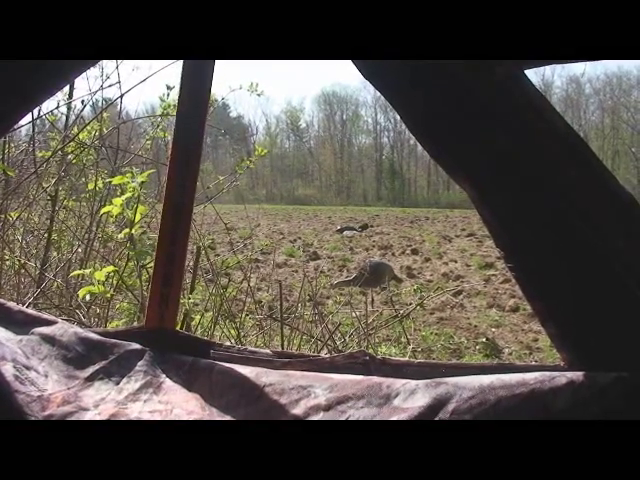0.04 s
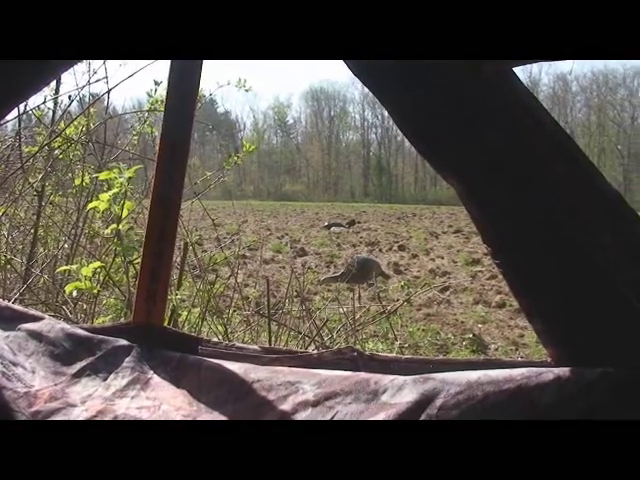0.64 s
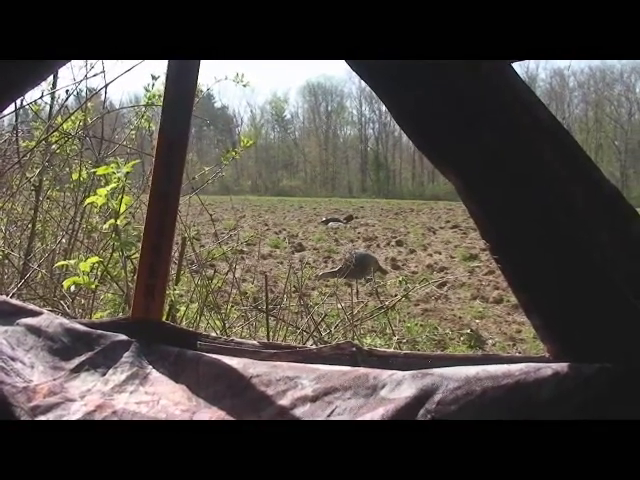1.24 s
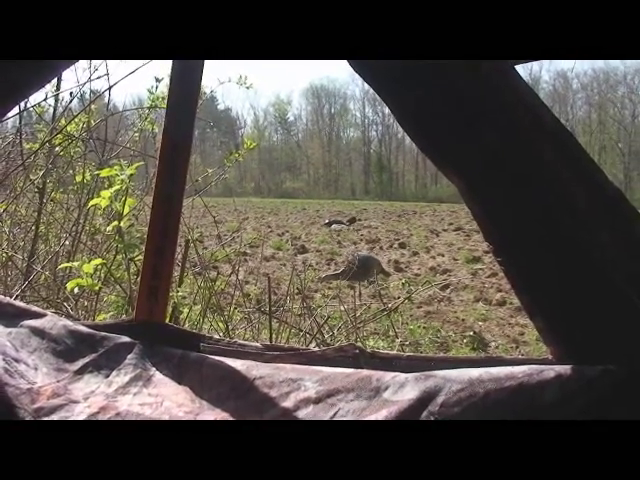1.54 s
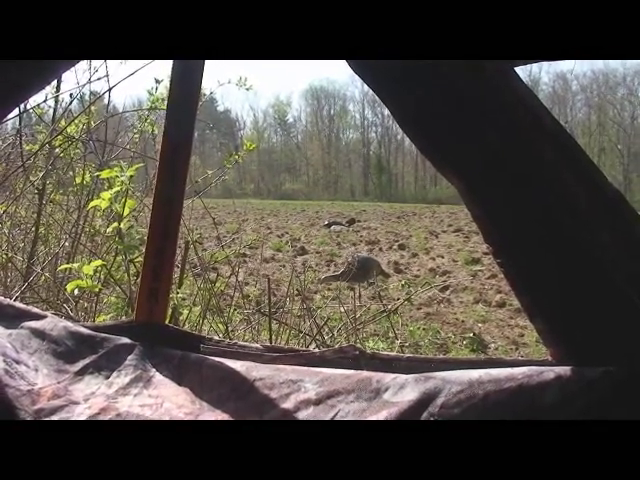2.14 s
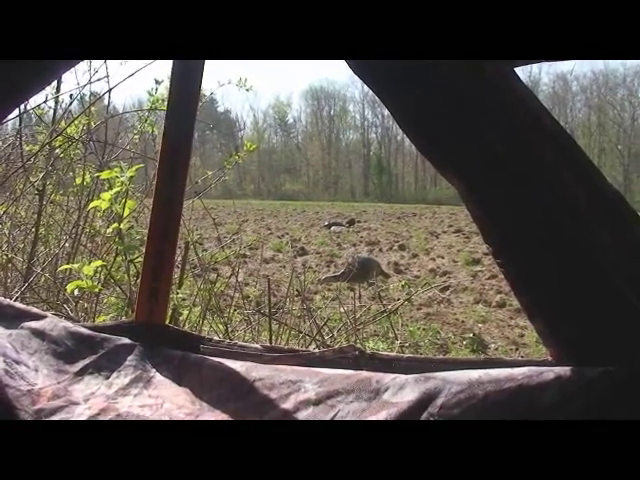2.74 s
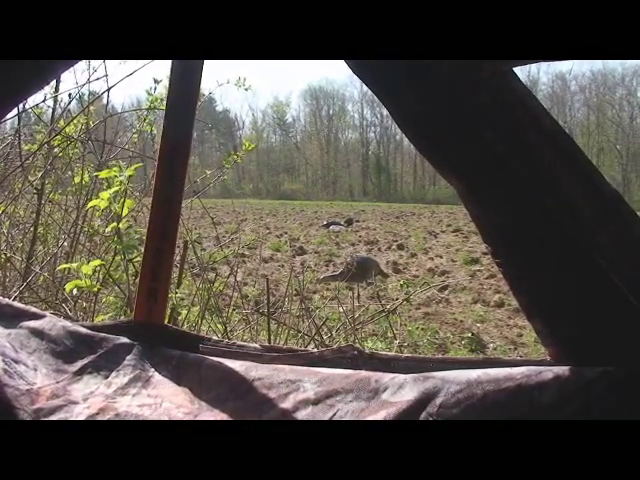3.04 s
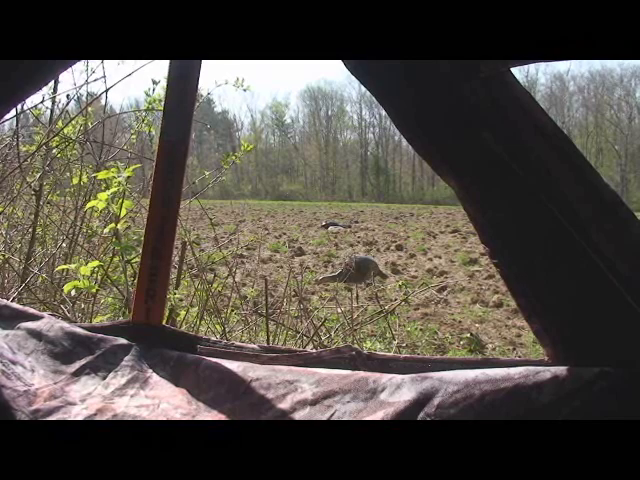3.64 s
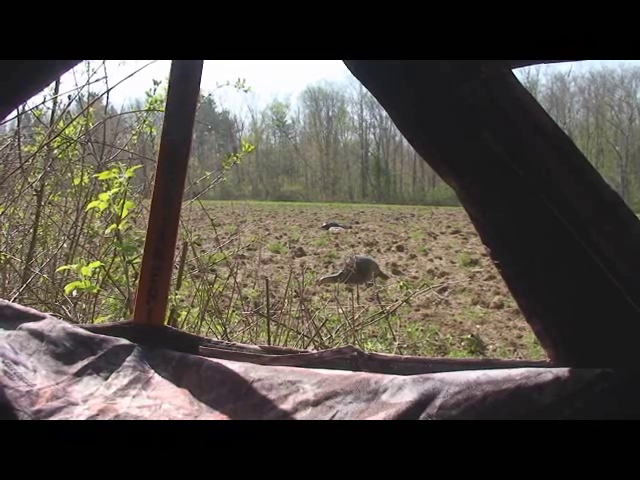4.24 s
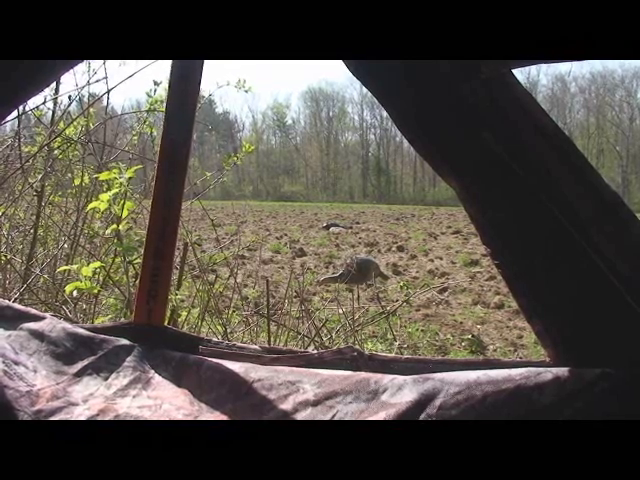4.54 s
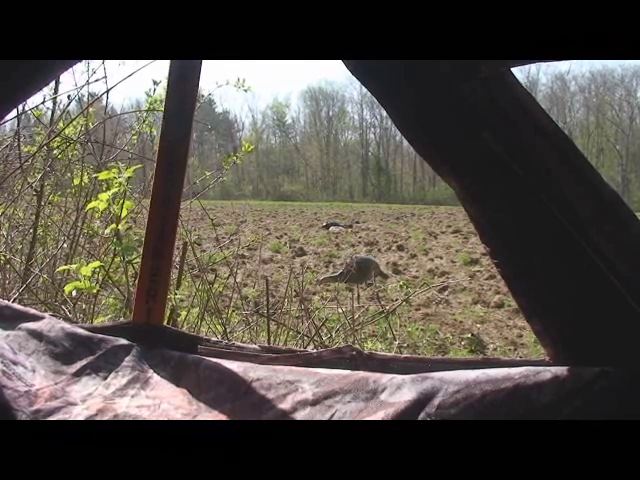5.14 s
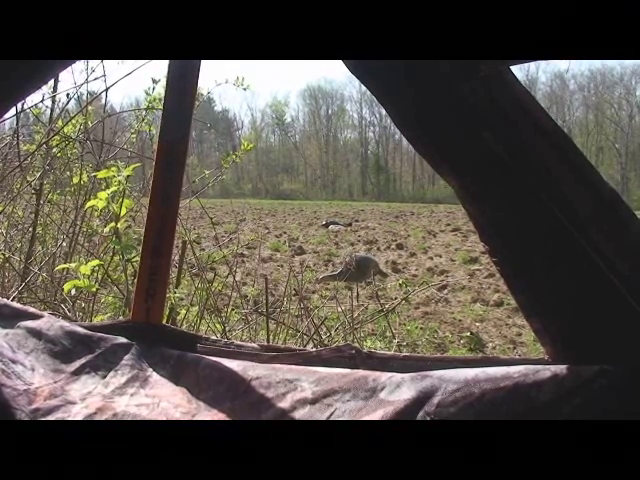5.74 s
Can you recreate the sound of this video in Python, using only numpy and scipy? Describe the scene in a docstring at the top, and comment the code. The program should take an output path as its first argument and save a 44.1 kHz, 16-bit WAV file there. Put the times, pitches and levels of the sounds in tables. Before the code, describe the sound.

A turkey close by gives a fast, loud run of short, scratchy yelps, with a few soft clucks and dry ticks in an open field.

```python
"""A turkey close to a cloth blind at the edge of a field, over a low rumble and open air.
Three dry ticks and a soft cluck come first. From 0.9 to 4.6 s the bird gives seventeen yelps:
a membrane in its throat starts in a scratchy squeak, breaks down to a reedy note, sags and frays out.
Two more ticks and two soft clucks follow. The blind rings briefly after each sound."""
import sys
import numpy as np
from scipy import signal
from scipy.fft import rfft, irfft, next_fast_len
from scipy.io import wavfile
from scipy.ndimage import uniform_filter1d, minimum_filter1d, map_coordinates

SR = 44100
rng = np.random.default_rng(int(sys.argv[2]) if len(sys.argv) > 2 else 0)


def store_pcm(level_fs):
    """Save levels as 16-bit WAV."""
    pcm = np.round(np.clip(level_fs, -1, 1) * 32767).astype(np.int16)
    wavfile.write(sys.argv[1], SR, np.atleast_2d(pcm).T)


N = 255117
TOP_HZ = 15100


def amp(db):
    return 10 ** (np.asarray(db) / 20)


def unit_rms(x):
    return x / np.sqrt(np.mean(x ** 2) + 1e-20)


def blend(a, b, share):
    return a + (b - a) * share


def along(points, hz):
    """Interpolate (Hz, value) points on a log frequency axis."""
    point_hz, values = np.transpose(points)
    return np.interp(np.log(hz + 1), np.log(point_hz + 1), values)


def wobble(rate_hz, size):
    """A smooth random curve with rate_hz knots a second."""
    knots = rng.standard_normal(int(size * rate_hz / SR) + 4)
    return map_coordinates(knots, [np.arange(size) * rate_hz / SR])


def step(x, width):
    """A smooth rise from 0 to 1 around x = 0."""
    return .5 + .5 * np.tanh(x / width)


def filtered(x, response):
    """Apply a complex gain given as a function of Hz."""
    size = x.shape[-1]
    padded = next_fast_len(size + 4096)
    return irfft(rfft(x, padded) * response(np.fft.rfftfreq(padded, 1 / SR)), padded)[..., :size]


def noise(spectrum, size):
    """Coloured noise of rms 1."""
    return unit_rms(filtered(rng.standard_normal(size), lambda hz: amp(along(spectrum, hz))))


def add(track, sound, start_s):
    """Mix a stereo sound into the track."""
    part = track[:, max(round(start_s * SR), 0):][:, :sound.shape[1]]
    part += sound[:, :part.shape[1]]


def wide_noise(spectrum, width):
    """Stereo noise of rms 1; width is side over mid."""
    mid, side = noise(spectrum, N), noise(spectrum, N)
    return unit_rms(mid + width * np.array([[1], [-1]]) * side)


# Background level curves. Each row: time in seconds, relative rumble in dB, relative air in dB.
FIELD_LEVELS = [(0.0, -54, -59.5), (0.71, -53, -57.5), (1.0, -60, -49.5), (2.0, -75, -61), (3.64, -70, -63),
                (3.91, -67, -56.5), (4.23, -68, -69), (4.52, -78, -63), (5.02, -60.5, -64.5),
                (5.78, -61.5, -67)]
# Rumble and air spectra. Each row: frequency in Hz, relative density in dB.
RUMBLE_SPECTRUM = [(20, 2.5), (35, -7.5), (65, 7.5), (95, 8), (135, -1), (250, -11), (500, -10.5),
                   (1200, -85)]
AIR_SPECTRUM = [(100, -15.5), (400, -3.5), (800, -2), (1250, -1.5), (2000, -8.5), (3200, -15),
                (6500, -20.5), (11500, -23.5), (13500, -28.5), (15000, -49.5)]

def field():
    """A low, nearly mono rumble under a wider hush of open air."""
    times_s, *curves = np.transpose(FIELD_LEVELS)
    rumble_db, air_db = [np.interp(np.arange(N) / SR, times_s, curve) for curve in curves]
    rumble = amp(rumble_db + 3.5 + 2.2 * wobble(14, N)) * wide_noise(RUMBLE_SPECTRUM, width=.081)
    air = amp(air_db + 2.5 + .61 * wobble(25, N)) * wide_noise(AIR_SPECTRUM, width=.75)
    return rumble + air


# Decay of the blind. Each row: frequency in Hz, T60 in seconds.
BLIND_T60 = [(300, 0.067), (2000, 0.13), (5000, 0.15), (12000, 0.11)]
# Strength of its reflections. Each row: frequency in Hz, reflected over direct in dB.
BLIND_ECHO = [(600, -12), (1500, -11.5), (2400, -11), (5000, -4), (12000, -4)]
# Balance of the direct sound. Each row: frequency in Hz, left minus right in dB.
LEFT_GAIN = [(700, -0.5), (1300, 1), (2300, 2.5), (4300, 3), (8000, -1)]
# Phase of the direct sound. Each row: frequency in Hz, lead of the left port in radians.
LEFT_LEAD = [(100, -0.36), (780, -1.89), (2300, -1.31), (3200, -1.6), (5000, -0.49), (7000, 0.43),
             (14000, 0.89)]

def blind(x):
    """A near sound reaches two microphone ports directly and in a short wash of reflections."""
    band_hz, t, bands = signal.stft(rng.standard_normal((2, SR // 4)), SR, nperseg=256)
    decay = amp(-60 * t / along(BLIND_T60, band_hz)[:, None])
    tail = signal.istft(bands * decay, SR, nperseg=256)[1]
    tail *= step(np.arange(tail.shape[1]) / SR - .003, .00064)
    wash = signal.fftconvolve(x[None], tail / np.linalg.norm(tail[0]), axes=1)[:, :len(x)]
    side = np.array([[.5], [-.5]])
    ports = lambda hz: amp(side * along(LEFT_GAIN, hz)) * np.exp(1j * side * along(LEFT_LEAD, hz))
    return filtered(x, ports) + filtered(wash, lambda hz: amp(along(BLIND_ECHO, hz)))


# Dry ticks. Each row: start in seconds, relative level in dB, relative treble in dB.
TICKS = [(.163, -40, -37), (.273, -36, -41), (.657, -43, 1), (5.056, -44.5, 9), (5.185, -42, -5)]
# Tick spectrum. Each row: frequency in Hz, relative density in dB.
TICK_SPECTRUM = [(200, -6), (1300, 7), (2500, 0.5), (5000, -13), (10000, -19), (14000, -42)]

def tick(level_db, treble_db, t60_s=.081):
    """A tiny dry snap of fast-decaying noise."""
    size = SR // 8
    t = np.arange(size) / SR
    shelf = lambda hz: amp((treble_db + 8.5) * step(hz - 3500, 1200))
    snap = unit_rms(filtered(noise(TICK_SPECTRUM, size), shelf))
    return amp(level_db - 9.5) * snap * amp(-60 * t / t60_s)


def membrane(pitch_hz, tone_db, flicker_db, partials=21):
    """A vibrating membrane heard through resonances; returns its wave at rms 1 and its phase."""
    order = np.arange(1, partials + 1)[:, None]
    phase = 2 * np.pi * np.cumsum(pitch_hz) / SR
    partial_hz = order * uniform_filter1d(pitch_hz, size=130)
    # high resonances shift as the mouth moves, so upper partials come and go
    flicker = np.array([wobble(22, len(pitch_hz)) for _ in order]) * step(partial_hz - 3000, 500)
    gain = amp(tone_db(partial_hz) + flicker_db * flicker) * (partial_hz < TOP_HZ)
    waves = gain * np.sin(order * phase + rng.uniform(0, 2 * np.pi, (partials, 1)))
    return waves.sum(0) / np.sqrt((gain ** 2).sum(0) / 2), phase


# Soft clucks. Each row: start in seconds, level in dB, pitch in Hz.
CLUCKS = [(0.73, -30.5, 610), (5.227, -37.5, 643.5), (5.661, -39.5, 625)]
# Cluck spectrum. Each row: frequency in Hz, relative level in dB.
CLUCK_SPECTRUM = [(600, -6), (1200, 6), (1850, 0), (2500, -18.5), (3700, -14), (6000, -34.5), (12000, -51)]

def cluck(level_db, pitch_hz):
    """A short, hoarse note: a jittering membrane plus noise of the same colour."""
    size = SR // 4
    t = np.arange(size) / SR
    jittered_hz = pitch_hz * np.exp(.041 * wobble(970, size))
    wave, _ = membrane(jittered_hz, lambda hz: along(CLUCK_SPECTRUM, hz), flicker_db=-8.5)
    swell = step(t - .006, .0054) * (1 - step(t - .019, .02))
    return amp(level_db) * swell * (wave + .58 * noise(CLUCK_SPECTRUM, size))


# Throat resonances. Each row: frequency in Hz, relative partial level in dB.
THROAT_RESPONSE = [(620, -6), (770, -22), (880, -19), (1050, -7), (1480, 5), (1590, -7.5), (1900, -2),
                   (2350, 2.5), (3050, -16), (3800, -18.5), (4300, -26), (5200, -18), (9200, -33.5),
                   (11200, -26), (13000, -57)]
# Throat turbulence and air past the membrane. Each row: frequency in Hz, relative density in dB.
RASP_SPECTRUM = [(150, -37.5), (600, -41), (850, -15.5), (1080, 2.5), (1650, -0.5), (2250, 7), (3300, -15),
                 (4300, -13), (5500, -17.5), (7800, -9), (9300, -28), (11300, -24.5), (12400, -45),
                 (15000, -63.5)]
HISS_SPECTRUM = [(2500, -33), (4250, -14), (5000, 3.5), (6700, -1.5), (8700, -23.5), (10700, -3),
                 (12500, -13), (15000, -55.5)]

def throat(pitch_hz, rough, open_db, treble_db):
    """Air drives the membrane and escapes in one puff per cycle; returns the voice and the hiss."""
    size = len(pitch_hz)
    jitter = .0028 * wobble(120, size) + rough * (.0517 * wobble(349.8, size) + .052 * wobble(1500, size))
    # a wider mouth gives stronger overtones
    tone_db = lambda hz: along(THROAT_RESPONSE, hz) + open_db * step(hz - 1900, 180)
    wave, phase = membrane(pitch_hz * np.exp(jitter), tone_db, flicker_db=3.5)
    wave *= amp(3.7 * rough * wobble(450, size))
    puffs = 1 + .5 * np.cos(phase)
    rasp = filtered(noise(RASP_SPECTRUM, size), lambda hz: amp(1.2 * open_db * step(hz - 1900, 300)))
    rasp_share = .68 * rough
    voice = np.sqrt(1 - rasp_share ** 2) * wave + rasp_share * unit_rms(rasp * puffs)
    # the small mouth radiates little bass
    radiation = lambda hz: amp(treble_db * step(hz - 3800, 1100) - 5.5 * step(400 - hz, 140))
    leak = amp(-23.5 + .5 * treble_db) * np.sqrt(.3 + rough)  # a clean note leaks less air
    return filtered(voice, radiation), leak * unit_rms(noise(HISS_SPECTRUM, size) * puffs)


# Yelps. Each row: start, break to the note, stop and fade width in seconds, squeak and note pitch
# in Hz, level in dB, treble lift in dB, roughness of the note from 0 to 1.
YELPS = [(.902, .915, .978, .003, 1130, 1038, -20, -3, .06),
         (1.111, 1.129, 1.205, .007, 1070, 630, -20, 5, .06),
         (1.313, 1.327, 1.387, .006, 1150, 693, -17.5, -6, .04),
         (1.495, 1.513, 1.579, .004, 1270, 729, -17, 2.5, .06),
         (1.67, 1.695, 1.75, .01, 1260, 757, -19.5, -1.5, .02),
         (1.86, 1.872, 1.945, .01, 1220, 758, -20, -2.5, .03),
         (2.06, 2.081, 2.144, .009, 1080, 769, -20, -3, .1),
         (2.278, 2.307, 2.369, .008, 1160, 776, -19.5, -3, .07),
         (2.511, 2.531, 2.593, .008, 1030, 777, -20, -3.5, .07),
         (2.741, 2.767, 2.832, .018, 1160, 787, -19, -1, .07),
         (3.003, 3.047, 3.1, .016, 1150, 765, -21, -1, .65),
         (3.251, 3.277, 3.346, .012, 1290, 773, -20, -1.5, .05),
         (3.487, 3.523, 3.572, .024, 1260, 784, -20, -1.5, .08),
         (3.776, 3.789, 3.882, .022, 1320, 1272, -20.5, -2.5, .22),
         (4.055, 4.096, 4.157, .009, 1240, 765, -19.5, 0, .03),
         (4.276, 4.303, 4.38, .014, 1060, 751, -20, -1.5, .03),
         (4.511, 4.534, 4.611, .016, 1130, 758, -20, -1, .04)]
WARM_UP_S, ATTACK_S = .33, .0018
SAG_PER_S, FRAY_HZ = .72, 1060

def yelp(start_s, break_s, stop_s, fade_s, squeak_hz, note_hz, level_db, treble_db, note_rough):
    """The membrane squeaks, drops to its low register, then loses its grip."""
    t = start_s + np.arange(int(.4 * SR)) / SR
    # as the bird warms up, its mouth opens and the squeak hardens
    effort = 1 - np.exp((YELPS[0][0] - start_s) / WARM_UP_S)
    overblown = step(note_rough - .15, .03)  # rough yelps open wider and swoop in from above
    open_db = blend(-34, 2, effort) + 2.5 * overblown
    squeak_db = blend(-5, -2.5, effort)
    squeak_rough = blend(blend(.43, .54, effort), .2, overblown)

    broken = step(t - break_s, .00057)
    frayed = t > stop_s + .2 * fade_s  # the register flips within one cycle
    note_s = stop_s - break_s
    position = np.clip(2 * (t - break_s) / note_s - 1, -1, 1)  # -1 to 1 across the note
    high_hz = squeak_hz * (1 + .79 * overblown * np.exp(-(t - start_s) / .008))
    low_hz = note_hz * (1 + np.where(position < 0, .01, -SAG_PER_S * note_s) * position ** 2)
    pitch_hz = blend(high_hz, low_hz, broken) + frayed * (FRAY_HZ - low_hz)

    # vibration is chaotic at the onset, at the break and as the pressure dies
    onset_rough = .11 * np.exp((start_s - t) / .008)
    break_rough = .23 * np.exp(-((t - break_s + .002) / .0065) ** 2)
    end_rough = .4 * step(t - stop_s - .001, .0049)
    rough = blend(squeak_rough, note_rough, broken) + onset_rough + break_rough + end_rough
    voice, hiss = throat(pitch_hz, np.clip(rough, 0, 1), open_db, treble_db)
    dulled = filtered(voice, lambda hz: amp(-2.5 * step(hz - 2900, 400)))
    voice = blend(voice, dulled, step(t - stop_s + .0044, .006)) * amp(squeak_db * (1 - broken))

    # pressure builds at once, slackens late in the note, then cannot drive the membrane
    attack = step(t - start_s - .003, ATTACK_S)
    slack = amp(-3 * np.maximum(position, 0) ** 3)
    ebb = (1 - step(t - stop_s - .005, fade_s)) * (1 - step(t - stop_s - .035, .012))
    return amp(level_db) * (voice + hiss) * attack * slack * ebb


def scene():
    """Yelps, clucks and ticks ring in the blind, over the field."""
    out = field()
    for start_s, *settings in YELPS:
        add(out, blind(yelp(start_s, *settings)), start_s)
    for start_s, level_db, pitch_hz in CLUCKS:
        add(out, blind(cluck(level_db, pitch_hz)), start_s)
    for start_s, level_db, treble_db in TICKS:
        add(out, blind(tick(level_db, treble_db)), start_s)
    return out


def limiter(x, ceiling_db):
    """The gain ducks just ahead of each peak that would pass the ceiling."""
    needed = np.minimum(1, amp(ceiling_db) / (np.abs(x).max(0) + 1e-9))
    return x * uniform_filter1d(minimum_filter1d(needed, size=265), size=133)


def record(dry):
    """The camera holds down the peaks and cuts everything above TOP_HZ."""
    return filtered(limiter(dry, ceiling_db=-10.0), lambda hz: hz < TOP_HZ)


dry = scene()
out = record(dry)
store_pcm(out)
```